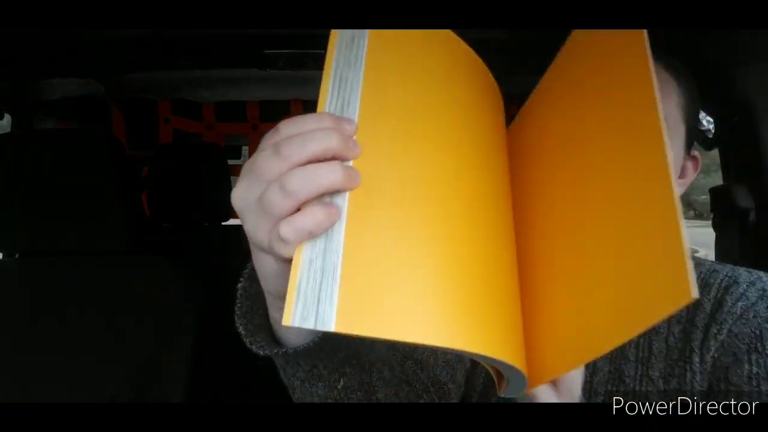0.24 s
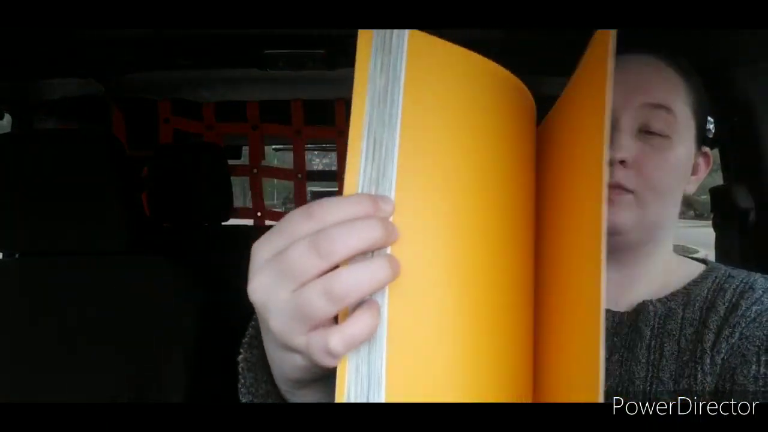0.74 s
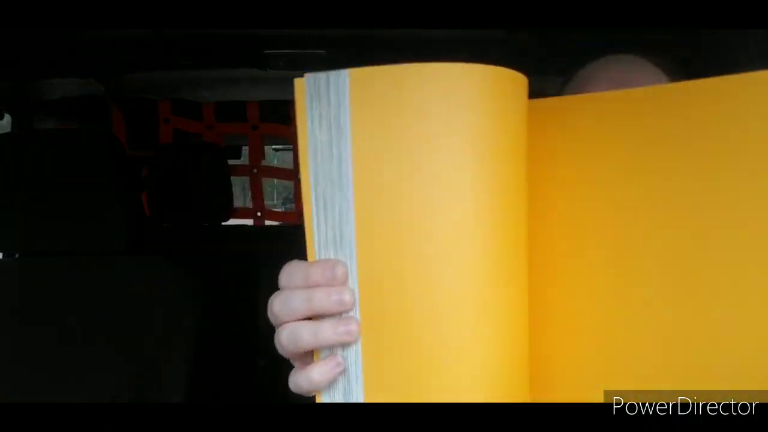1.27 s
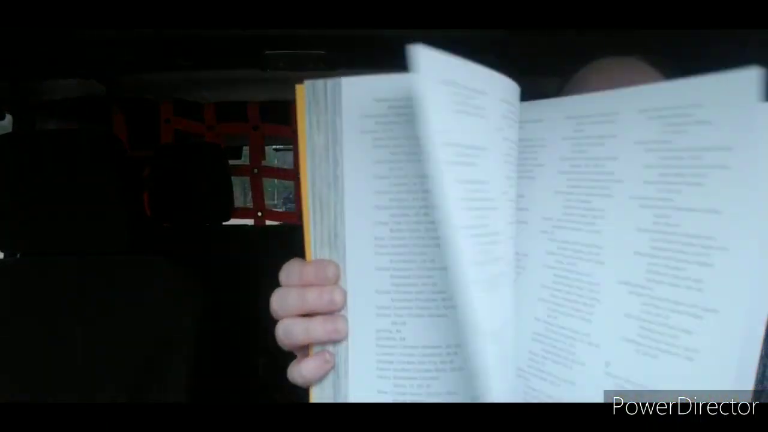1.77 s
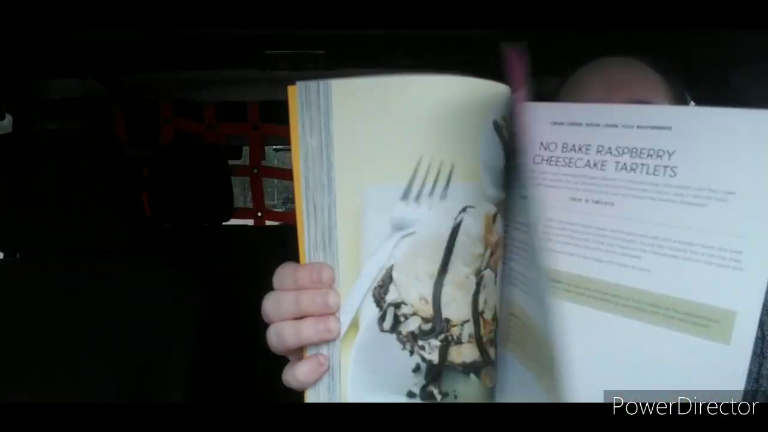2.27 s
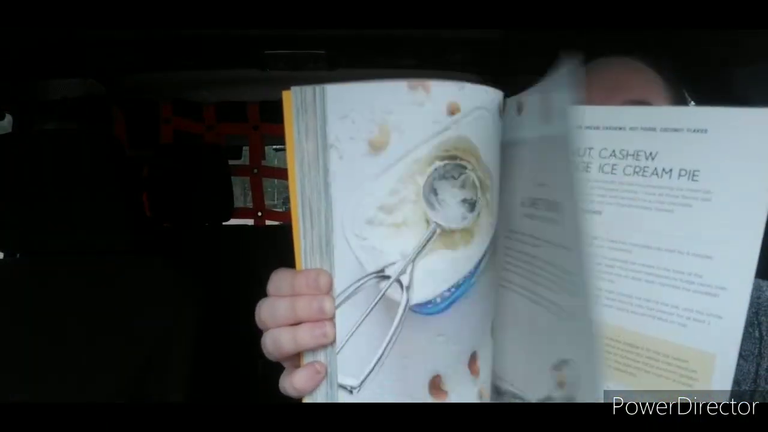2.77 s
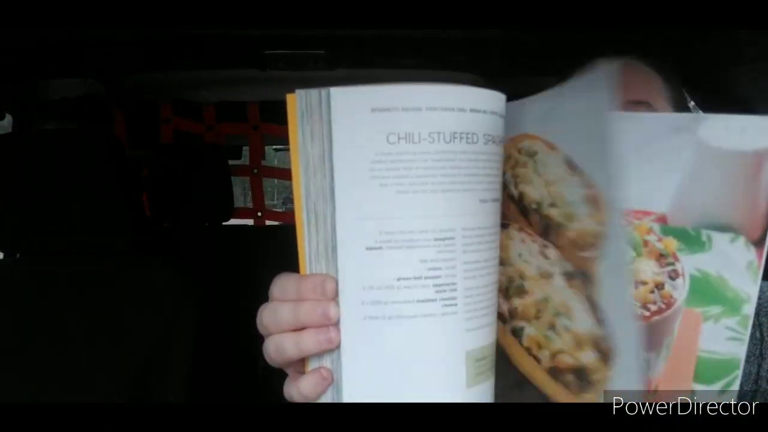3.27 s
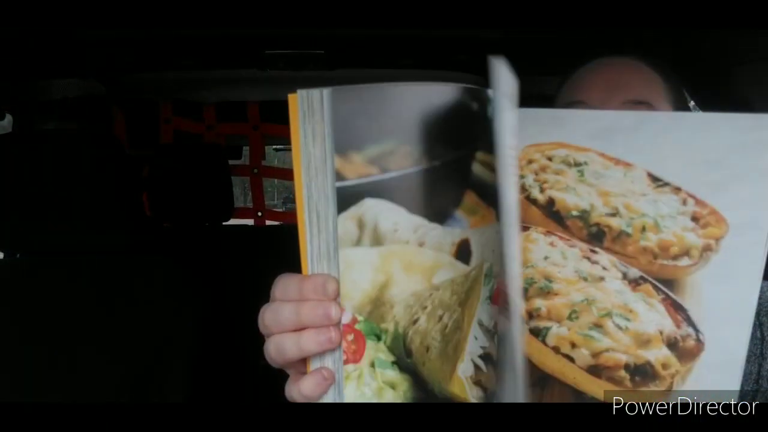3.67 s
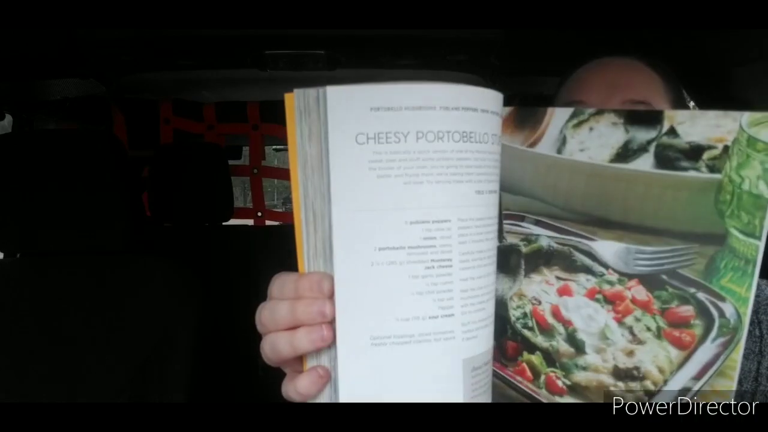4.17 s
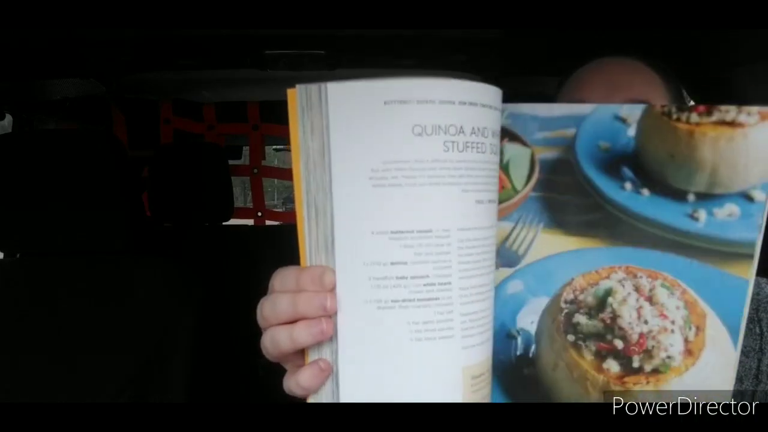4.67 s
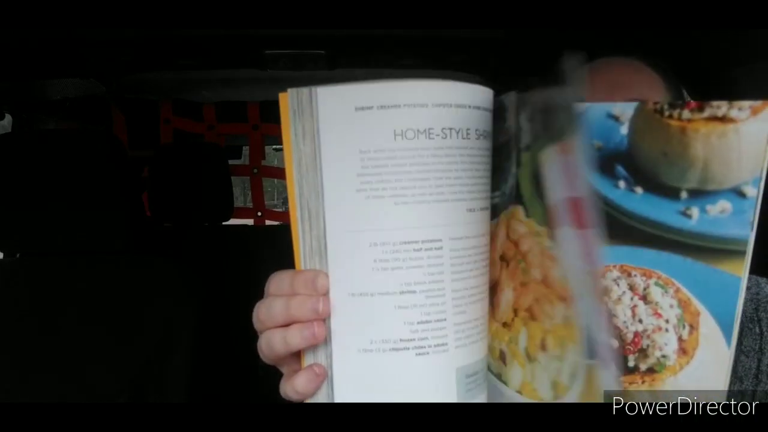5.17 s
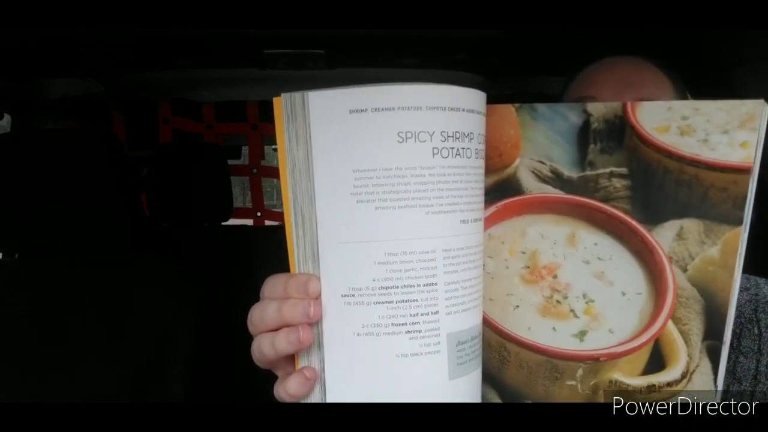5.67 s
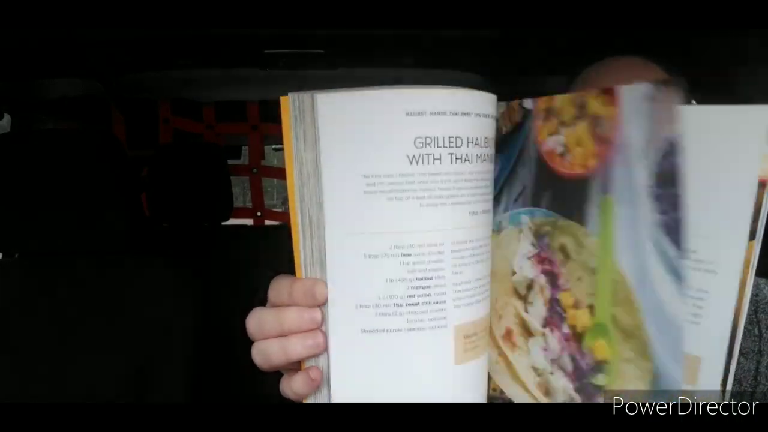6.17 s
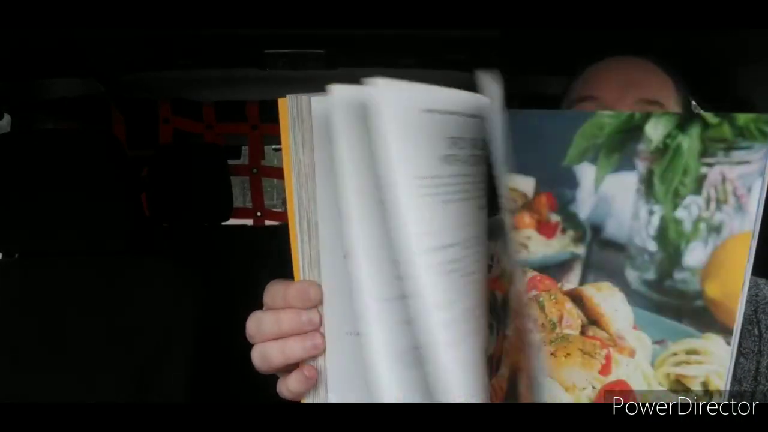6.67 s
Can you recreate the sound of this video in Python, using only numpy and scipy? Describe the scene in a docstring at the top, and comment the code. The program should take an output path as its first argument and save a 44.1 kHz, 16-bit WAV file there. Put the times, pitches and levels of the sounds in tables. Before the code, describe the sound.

A car engine idles with a steady low rumble, heard from inside the small cabin. Close to the microphone, a paperback is opened with short paper swishes, finger rubs, knocks of card and a soft thump of the spine. Quick, uneven page flips follow, ticking, crackling and flapping with very short echoes. A wavering low drone rises and fades beneath them, and the flips finish in a sharper flurry.

```python
"""Inside a parked car with the engine idling, someone leafs through a paperback.
The engine hums, the cabin rumbles, and a low drone swells and fades. The cover is bent open: paper
slides with a hiss, fingers rub, the card buckles and the spine thumps. Then page after page snaps
off the thumb, crackles and flaps straight. The small padded cabin answers with short echoes."""
import sys
import numpy as np
from scipy import signal
from scipy.fft import rfft, irfft, next_fast_len
from scipy.io import wavfile
from scipy.ndimage import uniform_filter1d

SR = 44100
rng = np.random.default_rng(int(sys.argv[2]) if len(sys.argv) > 2 else 0)


def transcribe(signal):
    """Save signal, clipped to [-1, 1], as a 16-bit WAV file at the path in sys.argv[1]."""
    frames = np.atleast_2d(signal).T
    limited = np.clip(frames, -1, 1)
    pcm = np.round(limited * 32767).astype(np.int16)
    wavfile.write(sys.argv[1], SR, pcm)


N = 305613
TIME = np.arange(N) / SR


def from_db(db):
    """Turn decibels into a gain to multiply by."""
    return 10 ** (np.asarray(db) / 20)


def rms_one(x):
    """Scale a signal so that its average strength (rms) is 1."""
    return x / np.sqrt(np.mean(x ** 2) + 1e-20)


def at_hz(points, hz):
    """Read between the rows of a (frequency_hz, value) table, on a log-frequency axis."""
    knots, values = np.transpose(points)
    return np.interp(np.log(hz + 1), np.log(knots), values)


def drift(rate_hz):
    """A random wobble of size about 1 that heads for a new value rate_hz times a second."""
    knots = rng.standard_normal(4000)
    return rms_one(np.interp(TIME * rate_hz, np.arange(len(knots)), knots))


def stereo_noise(alike):
    """White noise; alike (0 to 1) is the share that left and right have in common."""
    return np.sqrt(alike) * rng.standard_normal(N) + np.sqrt(1 - alike) * rng.standard_normal((2, N))


def colour(x, spectrum):
    """Give both channels the tone colour of a (frequency_hz, level_db) table."""
    size = 1024
    gains = rms_one(from_db(at_hz(spectrum, np.arange(size // 2 + 1) * SR / size)))
    # minimum phase: the filter never rings before the sound arrives
    cepstrum = irfft(np.log(gains))
    cepstrum[1:size // 2] *= 2
    cepstrum[size // 2 + 1:] = 0
    impulse_response = irfft(np.exp(rfft(cepstrum)))
    return signal.fftconvolve(x, impulse_response[None], axes=1)[:, :x.shape[1]]


def resonate(x, modes):
    """Let a signal ring in (pitch_hz, width_hz, level_db) bands; the result has strength 1."""
    out = 0
    for hz, width, mode_db in modes:
        band = signal.butter(2, [hz - width / 2, hz + width / 2], "band", fs=SR, output="sos")
        out = out + from_db(mode_db) * rms_one(signal.sosfilt(band, x))
    return rms_one(out)


def strokes(rows, rise_db_per_s, swell_db, fall_db_per_s):
    """Gain over time for (start_s, length_s, level_db) strokes: each fades in, holds and dies away."""
    power = 0
    for start, length, end_db in rows:
        early, late = np.maximum(start - TIME, 0), np.maximum(TIME - start - length, 0)
        held_db = np.interp(TIME, [start, start + length], [end_db - swell_db, end_db])
        stroke_db = held_db - rise_db_per_s * early - fall_db_per_s * late
        power = power + from_db(np.maximum(stroke_db, -140)) ** 2
    return np.sqrt(power)


def cracks(rows, column, spectrum, crack_s, flutter, cabin, ring_db=None):
    """Paper cracks, flutters and leaves a tail in the cabin, at the level in the chosen column.
    Rows begin with start_s; with ring_db, each rings at the pitch_hz that ends its row.
    flutter and cabin are (level_db, seconds to fade by 60 dB)."""
    t = TIME[:SR // 8]
    out = np.zeros((2, N + len(t)))
    snap = np.exp(-t / crack_s)
    shiver, tail = (from_db(db - 60 * t / fade_s) * (1 - snap) for db, fade_s in (flutter, cabin))
    for row in rows:
        noise = rng.standard_normal((3, len(t)))
        # the sheet shivers in lumps about a millisecond long
        lumps = np.exp(0.14 * rms_one(uniform_filter1d(rng.random((2, len(t))) - .5, size=50)))
        burst = 0.68 * noise[0] * snap + noise[1:] * (0.6 * snap + lumps * shiver + tail)
        burst[:, 0] += rng.uniform(2.2, 4.8)  # the click of release
        if ring_db is None:
            # every bend has its own size, so its own ripple in the spectrum
            lag = int(rng.uniform(.0003, .0015) * SR) + 1
            delayed = np.pad(burst, ((0, 0), (lag, 0)))[:, :len(t)]
            burst = burst + rng.choice([-1, 1]) * 0.43 * delayed
        else:
            ring = signal.lfilter(*signal.iirpeak(row[-1], Q=8, fs=SR), burst)
            burst = burst + from_db(ring_db) * ring
        burst = colour(burst, spectrum)
        # give each burst the energy of one millisecond at strength 1
        burst = burst / np.sqrt(np.mean(np.sum(burst ** 2, axis=1)) * 1000 / SR)
        start = max(round(row[0] * SR), 0)
        out[:, start:start + len(t)] += from_db(row[column]) * burst
    return out[:, :N]


def engine(firing_hz=33.64, level_db=-41.5):
    """The idling engine fires at a nearly even pace, making one deep tone."""
    phase = 2 * np.pi * np.cumsum(firing_hz + 0.14 * drift(2.84)) / SR
    return from_db(level_db + .5 * drift(6)) * np.sqrt(2) * np.sin(phase)


# the cabin's steady tones: pitch_hz, width_hz, level_db
CABIN_TONES = [(200, 6.1, -58), (287.9, 16, -62.5), (394.5, 19, -62.5), (605, 8.4, -68.5)]

def cabin_hum():
    """The cabin hums: noise rings in a few narrow bands."""
    shake = stereo_noise(alike=0.9)
    return sum(from_db(db) * resonate(shake, [(hz, width, 0)]) for hz, width, db in CABIN_TONES)


# tone colours of the car's rumble and of a faint treble hiss: frequency_hz, level_db
RUMBLE_COLOUR = [(15, -6), (30, -0.5), (48, 0), (62, 2.5), (85, -3.5), (125, -2.5), (160, -9), (280, -11.5),
                 (480, -13), (700, -20.5), (1000, -29), (1400, -45.5), (3000, -66), (8000, -59.5)]
HISS_COLOUR = [(500, -25), (1800, -0.5), (3500, -2), (5600, -10.5), (7300, -4), (8500, -10.5), (9700, 2),
               (11200, -3), (12800, 6), (14000, 0.5), (15400, -1), (16200, -35)]
# how alike left and right are: frequency_hz, likeness (1 = the same)
LIKENESS = [(30, 0.89), (130, 0.91), (260, 0.88), (550, 0.3), (1200, 0), (3000, 0.014), (16000, 0)]

def rumble_and_hiss():
    """Rumble and faint hiss; long waves reach both sides alike, short ones do not."""
    size = next_fast_len(N)
    mid, side = rfft(rng.standard_normal((2, size)))
    hz = np.arange(len(mid)) * SR / size
    alike = np.clip(at_hz(LIKENESS, hz), -1, 1)
    air = np.sqrt(1 + alike) * mid + np.sqrt(1 - alike) * side * [[1], [-1]]
    rumble, hiss = (rms_one(irfft(air * from_db(at_hz(spectrum, hz)), size)[:, :N])
                    for spectrum in (RUMBLE_COLOUR, HISS_COLOUR))
    return from_db(-46.5) * rumble + from_db(-66.5 + 0.13 * drift(4.7)) * hiss


# how the drone swells: time_s, tone_db, octave_db
DRONE_SWELLS = [(1.3, -61, -70.8), (1.8, -58, -74), (2.45, -54, -76), (2.7, -60.5, -73), (3.1, -51, -72),
                (3.55, -45.8, -65), (3.85, -52.5, -70.8), (4.12, -42.5, -57), (4.42, -64.8, -55),
                (4.75, -49, -58.5), (5.05, -53, -66), (5.4, -51.5, -53.5), (5.9, -64, -64), (6.8, -68, -68)]
# how its pitch moves: time_s, pitch_hz
DRONE_PITCH = [(1.5, 118.5), (2.6, 107.4), (3.6, 109), (4.1, 111.2), (4.4, 114.4), (5.6, 118.2)]

def drone():
    """A wavering low tone and its octave come and go."""
    hz = np.interp(TIME, *np.transpose(DRONE_PITCH)) + 1.177 * drift(6)
    phase = 2 * np.pi * np.cumsum(hz) / SR
    times, tone_db, octave_db = np.transpose(DRONE_SWELLS)
    times = np.r_[times[0] - .1, times, times[-1] + .1]  # room to fade in and out
    tone, octave = (from_db(np.interp(TIME, times, np.r_[-100, db, -100])) for db in (tone_db, octave_db))
    waver = from_db(0.5 + 1.35 * drift(7))
    return np.sqrt(2) * waver * (tone * np.sin(phase) + octave * np.sin(2 * phase))


# echoes off the windscreen, roof and book, for each side: delay_ms, gain
ECHOES_LEFT = [(.62, 0.12), (2.9, 0.14), (4.7, -0.2), (7.9, 0.23)]
ECHOES_RIGHT = [(.85, -0.015), (3.4, -0.11), (5.6, 0.38), (7.1, -0.61)]

def near_echoes(x):
    """Hard surfaces close by add quick echoes, different on the left and right."""
    out = []
    for side, echoes in zip(x, (ECHOES_LEFT, ECHOES_RIGHT)):
        bounced = sum(gain * np.interp(TIME - ms / 1000, TIME, side, left=0) for ms, gain in echoes)
        out.append(side + bounced)
    return np.array(out)


# tone colour of crisp ticks, here and in the buckling cover: frequency_hz, level_db
CRISP_COLOUR = [(900, -64), (2200, -44.5), (3500, -6), (5200, 0), (7200, 2.5), (8500, -7), (10500, 5),
                (13000, 3), (15000, -1), (16500, -9)]

def stray_ticks(per_s, tick_db):
    """The bent stack of pages ticks faintly under the thumb at random moments."""
    when, strength = rng.random((int(per_s * N / SR), 2)).T
    rows = np.c_[when * N / SR, tick_db + 8 * (strength - .5)]
    return cracks(rows, 1, CRISP_COLOUR, crack_s=.00054, flutter=(-8, .04), cabin=(-31, .12))


# strokes of paper over paper: start_s, length_s, level_db
SLIDES = [(.04, 0.038, -55), (.145, 0.067, -38), (.27, .03, -58), (.32, 0.036, -52.5), (.39, 0.063, -58.5),
          (.48, .04, -67), (.598, 0.019, -43.5), (.665, 0.062, -41.5), (.78, 0.018, -57.5),
          (.87, 0.074, -59), (1.03, 0.16, -59.5)]
# tone colour of their hiss: frequency_hz, level_db
SLIDE_COLOUR = [(900, -21), (2600, -17.5), (4000, -11), (5800, -9.5), (7100, -11), (8400, -13), (10500, -5),
                (12800, -0.5), (14000, 2), (15500, -16.5)]
# faint ringing of the gap between sheet and cover: pitch_hz, width_hz, level_db
GAP_MODES = [(3780, 1200, -8), (5080, 570, -8), (7000, 1100, -2), (12700, 690, -5)]

def sliding_paper(catches_per_s=900):
    """Countless fibres catch and let go: a bright, gritty hiss that gains speed and stops short."""
    catches = (rng.random(N) < catches_per_s / SR) * rng.standard_normal(N)
    grain = rms_one(stereo_noise(alike=0.037) + 0.11 * rms_one(catches))
    grain *= from_db(1.2 * drift(160))
    grain = rms_one(grain + 0.18 * resonate(grain, GAP_MODES))
    loudness = strokes(SLIDES, rise_db_per_s=324, swell_db=2, fall_db_per_s=650)
    return loudness * colour(grain, SLIDE_COLOUR)


# fingers rubbing the cover: start_s, length_s, level_db, brightness_db
RUBS = [(0.028, 0.085, -66, 3.5), (0.215, 0.015, -51.5, 6.5), (.273, 0.021, -52.5, 2.5),
        (0.319, .027, -54, 13.5), (0.396, 0.035, -65, 5), (0.593, 0.028, -55.5, 2),
        (.646, 0.0048, -43.5, 5.5), (0.732, 0.029, -56, 3), (0.838, 0.025, -67, 6), (0.897, 0.044, -58, -1),
        (1.013, 0.13, -52, -5.5), (1.185, 0.016, -51.5, -8), (1.312, 0.044, -63, -8),
        (1.417, 0.032, -59, -7)]
# the cover's low and high ringing: pitch_hz, width_hz, level_db
COVER_LOW = [(1037, 200, 0)]
COVER_HIGH = [(1747, 205, -1.5), (1870, 170, 0.5), (2400, 680, 1)]

def rubbing_fingers():
    """Fingers stick and slip on the cover and make it ring."""
    slips_per_s = 230 * from_db(4 * drift(150))
    slip_count = np.floor(np.cumsum(slips_per_s) / SR)
    slips = np.diff(slip_count, prepend=0) * from_db(4.7 * drift(200))
    friction = rms_one(slips) + 1.3 * stereo_noise(alike=0.073)
    start, length, grip_db, bright_db = np.transpose(RUBS)
    low, high = (strokes(zip(start, length, db), rise_db_per_s=1200, swell_db=-0.9, fall_db_per_s=800)
                 for db in (grip_db - 3.5, grip_db + bright_db - 5))
    return low * resonate(friction, COVER_LOW) + high * resonate(friction, COVER_HIGH)


# soft thumps of the spine: start_s, level_db
THUMPS = [(.648, -36), (1.443, -37.5)]

def spine(pitch_hz=243, fade_s=0.037):
    """The whole stack of pages rings low and briefly when the spine gives way."""
    out = 0
    for start, level_db in THUMPS:
        age = np.clip(TIME - start, 0, 1)
        out = out + from_db(level_db - 60 * age / fade_s) * np.sin(2 * np.pi * pitch_hz * age)
    return out


# the cover and pages buckling: start_s, knock_db, edge_db, pitch_hz
BUCKLES = [(0.03, -45, -53, 1430), (0.212, -32.5, -39, 1510), (0.308, -31.5, -59, 1760),
           (0.327, -28.5, -58, 1770), (0.341, -36.5, -60, 1080), (0.639, -54, -32.5, 945),
           (0.649, -34.5, -32, 953), (0.747, -38.5, -58, 1040), (0.91, -42.5, -52, 780),
           (1.164, -31.5, -50, 860), (1.187, -38, -65, 950), (1.215, -44, -57, 1870),
           (1.442, -37, -55, 880), (6.02, -38.5, -56, 1460), (6.697, -40.5, -42, 1570)]
# tone colour of the knock: frequency_hz, level_db
KNOCK_COLOUR = [(300, -23), (700, 1), (1000, 2.5), (1350, 0.5), (1800, 1.5), (2800, -9.5), (6000, -11.5),
                (16000, -45)]

def buckling_cover():
    """Stiff card buckles against the fingers: a hollow knock with a crisp edge."""
    knock = cracks(BUCKLES, 1, KNOCK_COLOUR, crack_s=.0025, flutter=(-5.5, .043), cabin=(-14, .28),
                   ring_db=10)
    edge = cracks(BUCKLES, 2, CRISP_COLOUR, crack_s=.00092, flutter=(7, .042), cabin=(-30, .12))
    return from_db(-1.5) * knock + from_db(4) * edge


# pages leaving the thumb: start_s, snap_db, flap_db, extra_crackle_db, flap_wait_s, pitch_hz, creep_s
PAGE_SNAPS = [(1.447, -27.5, -56.5, -6, 0.0017, 3200, 0), (1.6125, -29, -58.5, -4.5, 0.0017, 3450, 0),
              (1.7685, -45, -47.5, 3, 0.00086, 3650, .015), (1.9604, -25.5, -53.5, -4.5, .002, 3270, .015),
              (2.0358, -31, -52, -2, 0.00071, 1610, 0), (2.2131, -27.5, -50.5, 2.5, 0.015, 3320, 0),
              (2.6955, -31, -54, 5.5, 0.0018, 3580, 0), (2.8661, -32.5, -57.5, 5.5, 0.0011, 3470, 0),
              (3.022, -32.5, -46.5, 0.5, .002, 3600, 0), (3.1776, -33, -54, -1.5, .001, 3700, 0),
              (3.786, -37, -55, -2, .008, 3830, 0), (4.0133, -37.5, -61.5, -6, .001, 3350, 0),
              (4.1314, -43, -61, 1, 0.0012, 1650, 0), (4.2632, -45, -45.5, -7, 0.00091, 3370, 0),
              (4.4615, -32, -42.5, 3, .008, 3450, .063), (4.869, -30, -66, 2.5, 0.0019, 1450, 0),
              (4.908, -37.5, -55.5, 1.5, 0.0011, 2397, 0), (5.0879, -37, -46.5, 2.5, .0066, 3460, .05),
              (5.4039, -31, -44.5, 1.5, .009, 3400, 0), (5.4285, -38, -42, -5, .001, 3160, 0),
              (6.0196, -50, -49, 1, 0.00081, 1296, 0), (6.039, -28.5, -47.5, -0.5, 0.01, 1550, 0),
              (6.2623, -33.5, -60, 7, .001, 3460, .035), (6.2673, -25, -45, 1.5, 0.0054, 3400, 0),
              (6.4149, -22.5, -43.5, -6, 0.016, 3340, .015), (6.4375, -32, -48.5, 1, 0.0011, 1840, 0),
              (6.6148, -24, -43, -2.5, .009, 3430, .028), (6.6643, -24, -42.5, -1.5, 0.0072, 1680, .015),
              (6.6923, -34, -40, -6, .0045, 1620, 0)]
# lone slips of a page edge under the thumb: start_s, level_db
LONE_SLIPS = [(1.7492, -37), (2.6694, -40.5), (2.8492, -42.5), (3.5108, -44.5), (3.547, -46), (4.226, -38),
              (4.4938, -36.5), (4.6377, -46), (4.7421, -42.5), (5.235, -40.5), (5.327, -43), (5.3606, -44),
              (6.838, -41), (6.8666, -38), (6.8927, -39.5)]

def page_motions(slip_gap_s=.0113, jitter_s=.0022, lone_slip_hz=1550):
    """Pages may creep, then snap free and flap: rows of start_s, tick_db, crackle_db, flap_db, pitch_hz."""
    # what each motion adds to its own level: tick_db, crackle_db, flap_db
    slip_mix = np.array([-4, -15, -16])
    snap_mix = np.array([-4, -10.5, -21.5])
    flap_mix = np.array([8.5, 5, 6.5])
    rows = []
    for start, snap_db, flap_db, crackle_db, wait_s, hz, creep_s in PAGE_SNAPS:
        extra_db = np.array([0, crackle_db, 0])
        rows.append((start, *(snap_db + extra_db + snap_mix), hz))
        rows.append((start + wait_s, *(flap_db + extra_db + flap_mix), hz))
        # a creeping edge slips at a near-even pace, more strongly towards the snap
        for k in range(int(creep_s / slip_gap_s)):
            slip_s = start - (k + 1) * slip_gap_s + jitter_s * rng.standard_normal()
            slip_db = -40 - 1.4 * k
            rows.append((slip_s, *(slip_db + slip_mix), hz))
    return rows + [(start, *(db + slip_mix), lone_slip_hz) for start, db in LONE_SLIPS]


# tone colours of a page's three sounds: frequency_hz, level_db
TICK_COLOUR = [(3000, -52), (7500, -21), (9000, -8), (10500, -2.5), (11500, -5), (13000, 4), (15000, -7.5),
               (16500, -18)]
CRACKLE_COLOUR = [(1500, -27), (2800, -25.5), (3800, -16), (5200, 2), (6000, -1.5), (7200, 2), (8500, -17),
                  (11000, -1.5), (16000, -57)]
FLAP_COLOUR = [(500, -27), (1100, -11), (1450, -10), (1800, 0), (2300, -4.5), (2800, -1.5), (3400, -0.5),
               (4500, -0.5), (8000, -16), (16000, -51)]

def pages():
    """A freed edge ticks, the bent paper crackles, and the taut sheet gives a lower, pitched flap."""
    motions = page_motions()
    tick = cracks(motions, 1, TICK_COLOUR, crack_s=.0006, flutter=(-4, .038), cabin=(-20, .1))
    crackle = cracks(motions, 2, CRACKLE_COLOUR, crack_s=.0011, flutter=(-5, .036), cabin=(-26, .22))
    flap = cracks(motions, 3, FLAP_COLOUR, crack_s=.0025, flutter=(-3, .045), cabin=(-18, .22), ring_db=5)
    return tick + crackle + flap


def scene():
    """The book in front and a little to the left, the car all round."""
    book = pages() + buckling_cover() + rubbing_fingers() + spine() + sliding_paper()
    book += stray_ticks(per_s=3.6, tick_db=-58.5)
    lean_left = from_db([[1.45], [-1.45]])
    return near_echoes(book) * lean_left + engine() + cabin_hum() + rumble_and_hiss() + drone()


# how the two microphones differ: frequency_hz, left_minus_right_db
MIC_BALANCE = [(30, 5), (120, 6), (500, 1.5), (1000, 6), (1500, 2), (3500, 2), (6000, 2.5), (7800, 10),
               (8500, 3), (9500, -6.5), (11000, -2.5), (13000, 3), (15500, 3)]

def record(dry, cutoff_hz=16000):
    """Each microphone colours the sound its own way, and the highest treble is cut."""
    size = next_fast_len(N + SR // 10)
    spectrum = rfft(dry, size)
    balance_db = at_hz(MIC_BALANCE, np.arange(spectrum.shape[1]) * SR / size)
    heard = irfft(spectrum * from_db([balance_db / 2, -balance_db / 2]), size)[:, :N]
    return signal.sosfilt(signal.ellip(10, .2, 80, cutoff_hz, fs=SR, output="sos"), heard)


dry = scene()
out = record(dry)
transcribe(out)
```